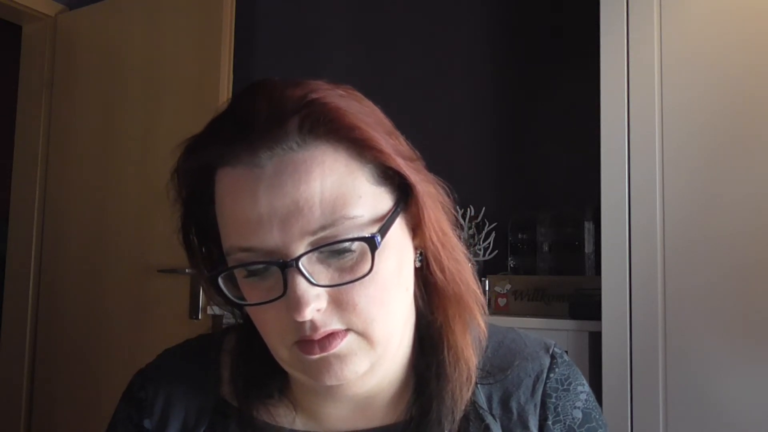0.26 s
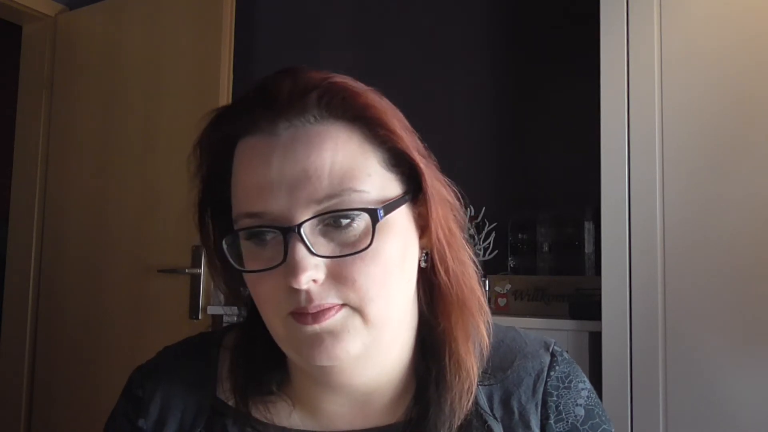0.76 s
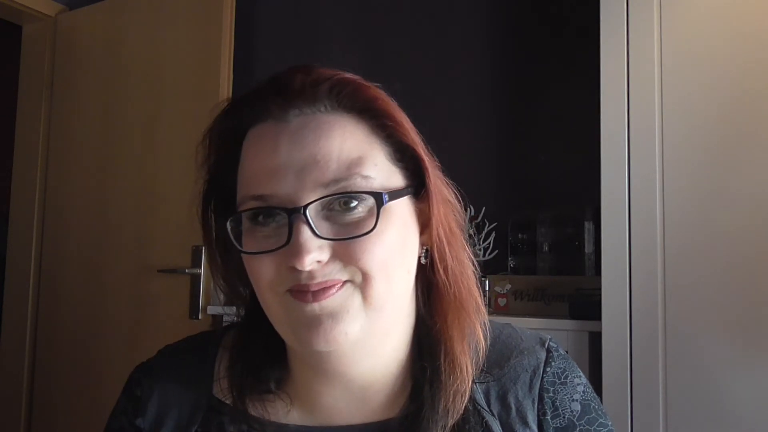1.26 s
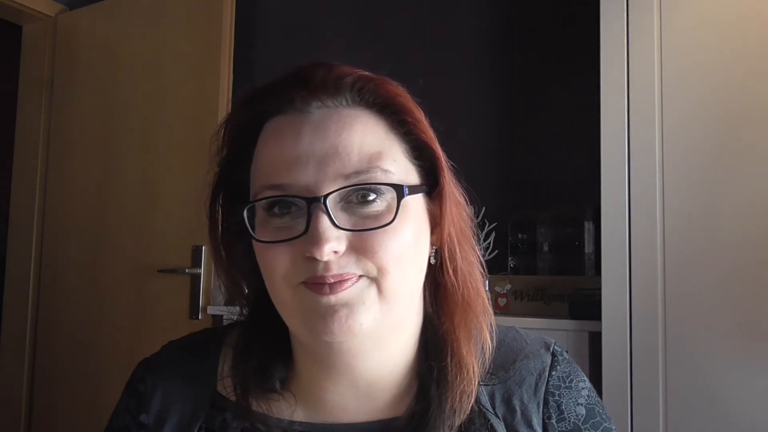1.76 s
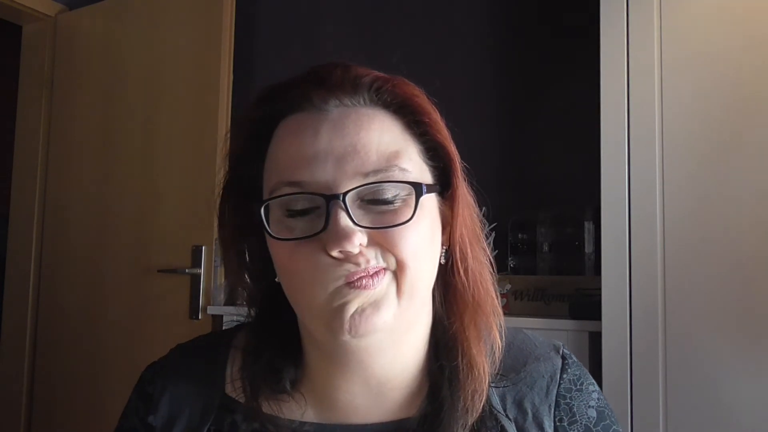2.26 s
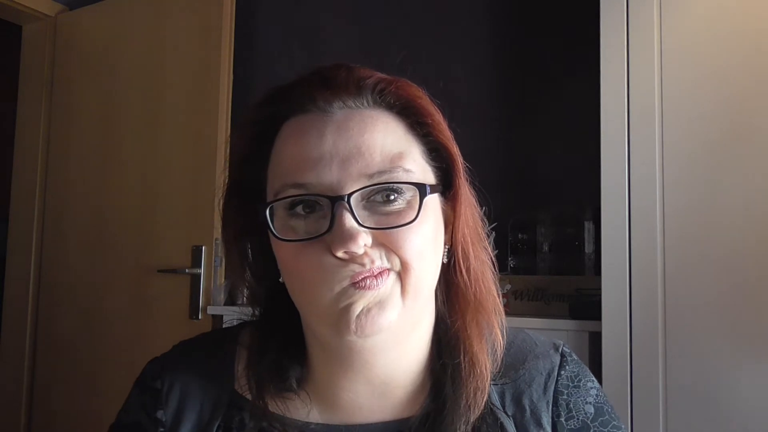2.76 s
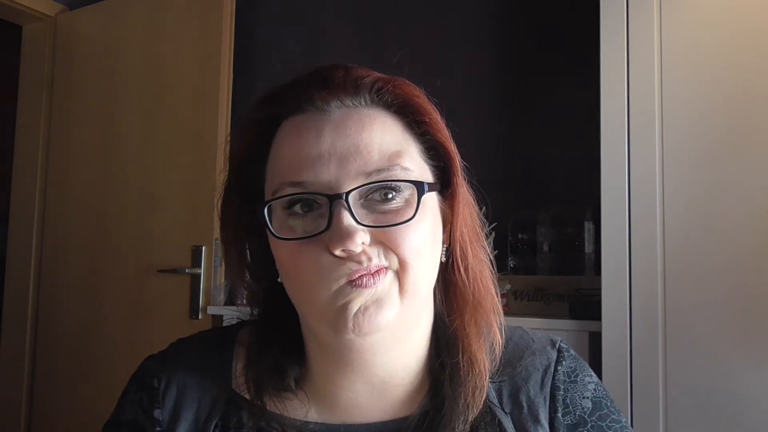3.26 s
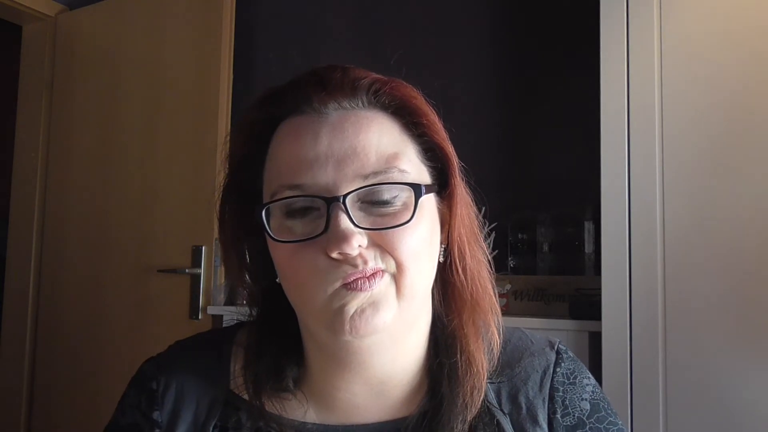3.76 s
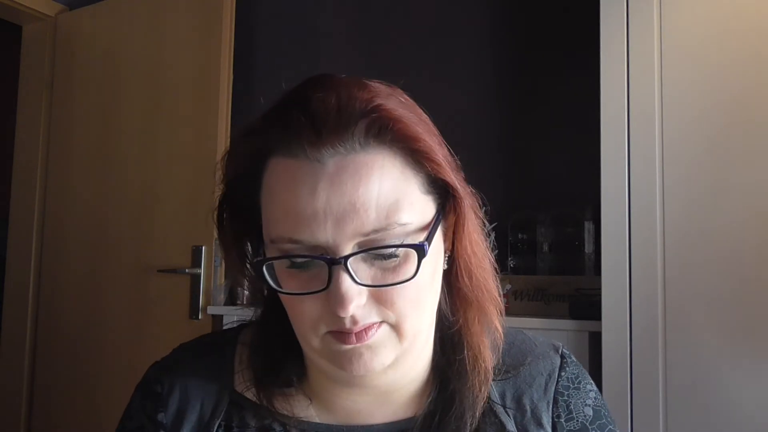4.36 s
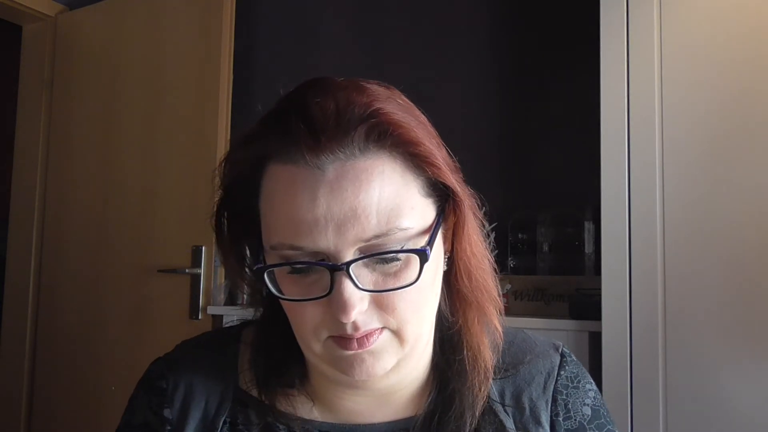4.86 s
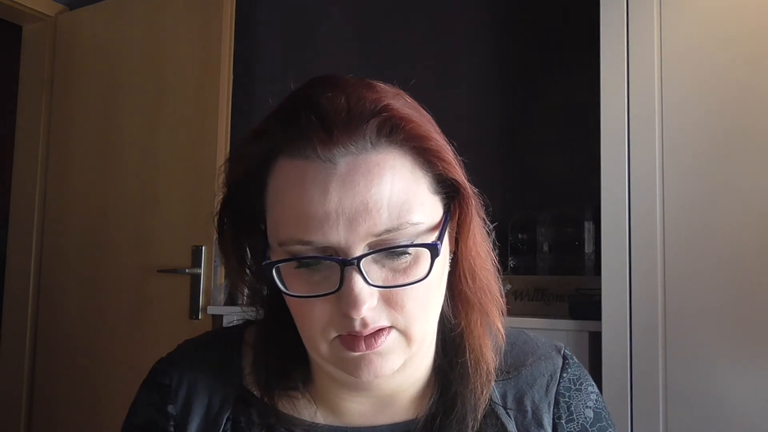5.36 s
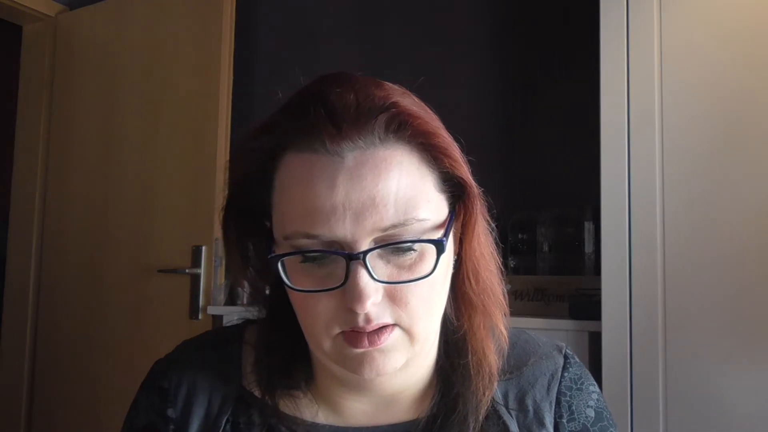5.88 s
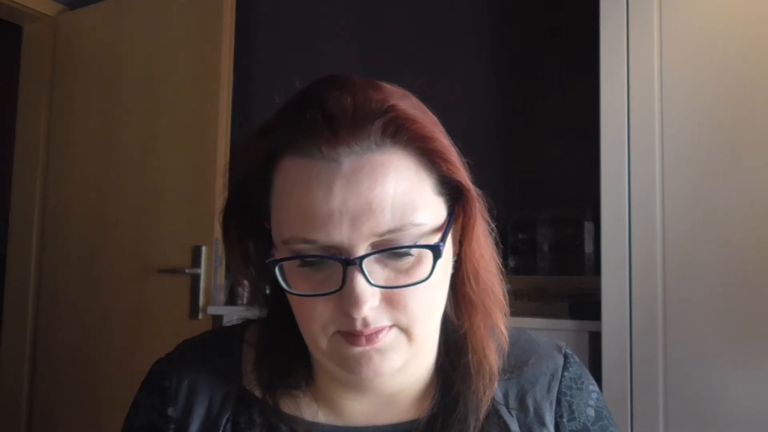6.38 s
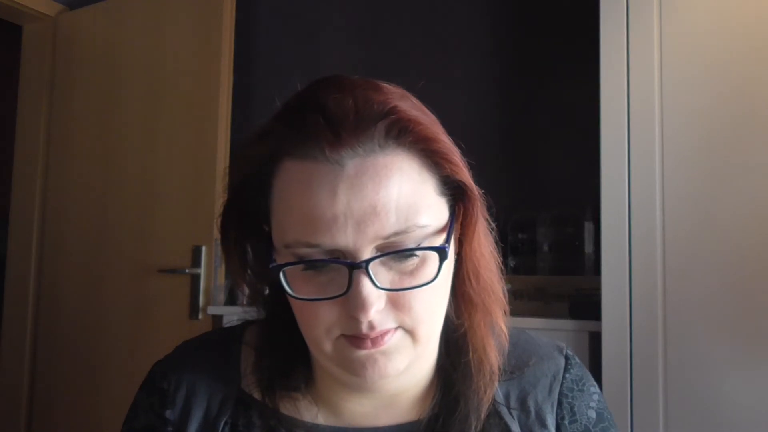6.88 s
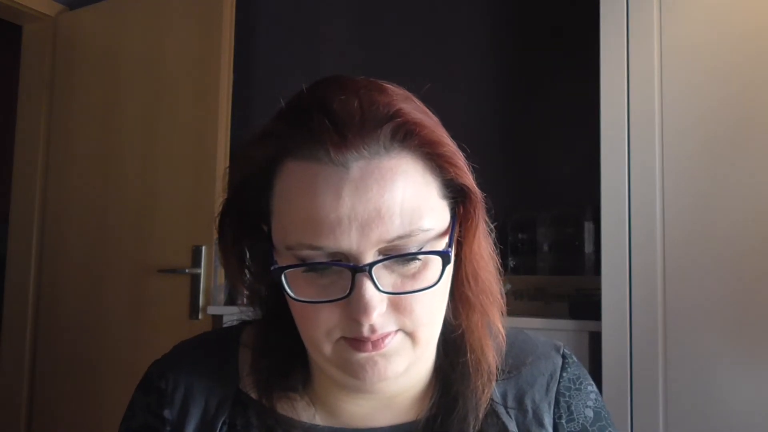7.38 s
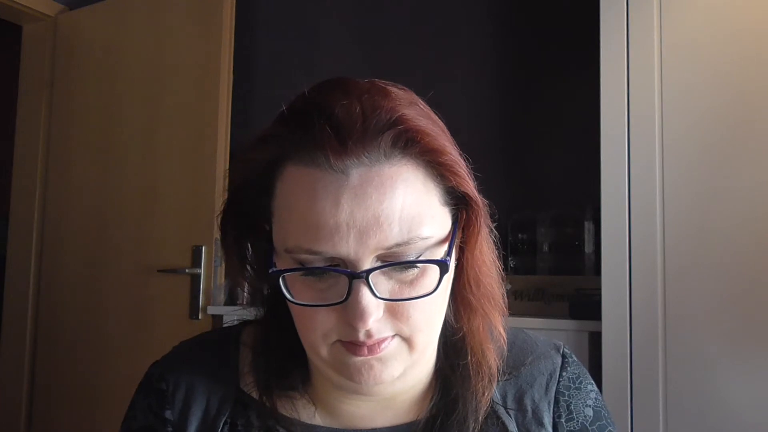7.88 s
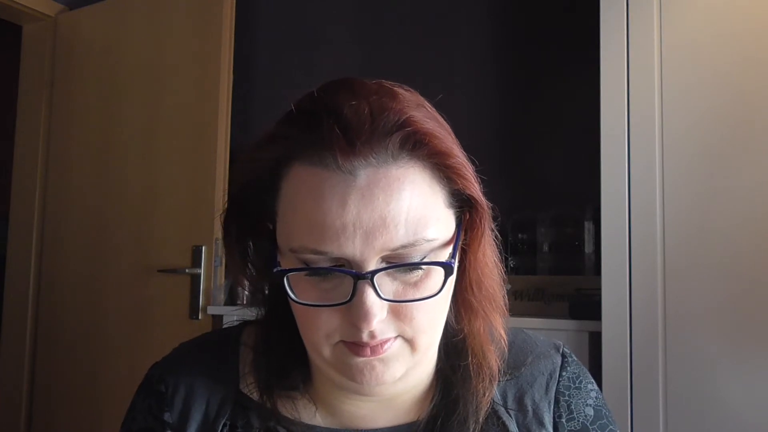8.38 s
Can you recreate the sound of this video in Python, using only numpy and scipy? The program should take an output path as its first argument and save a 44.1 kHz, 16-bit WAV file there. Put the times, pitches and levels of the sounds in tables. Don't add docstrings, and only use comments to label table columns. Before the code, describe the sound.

Close dry paper crackles and sparse clicks at a desk indoors build to crisp tugging and a double tear, then fade into light rustling.

```python
import sys
import numpy as np
from scipy import signal
from scipy.fft import rfft, irfft
from scipy.io import wavfile

SR = 44100
rng = np.random.default_rng(int(sys.argv[2]) if len(sys.argv) > 2 else 0)


def attenuation_scalar(level_db):
    decades = np.asarray(level_db, float) / 20
    return 10 ** decades


def master(y):
    cut = np.clip(np.atleast_2d(y).T, -1, 1)
    pcm = np.round(cut * 32767)
    wavfile.write(sys.argv[1], SR, pcm.astype(np.int16))


N = 380583


def rms_one(x):
    return x / np.sqrt(np.mean(x ** 2) + 1e-20)


def in_time(rows):
    s, *columns = np.transpose(rows)
    return [np.interp(np.arange(N) / SR, s, column) for column in columns]


def at_hz(points, hz):
    table_hz, value = np.array(points)[:, 0], np.array(points)[:, 1]
    return np.interp(np.log(hz + 1), np.log(table_hz), value)


def drift(rate_hz):
    r = np.exp(-2 * np.pi * rate_hz / SR)
    wander = signal.lfilter([1], [1, -2 * r, r * r], rng.standard_normal(N + SR))
    return rms_one(wander[SR:])


def colour(x, spectrum, fall_db_per_octave):
    hz = np.fft.rfftfreq(4096, 1 / SR) + 1
    low_hz, high_hz = spectrum[0][0], spectrum[-1][0]
    octaves_outside = np.log2(np.maximum(1, np.maximum(low_hz / hz, hz / high_hz)))
    gain_db = at_hz(spectrum, hz) - fall_db_per_octave * octaves_outside
    cepstrum = irfft(np.log(attenuation_scalar(gain_db)))
    cepstrum[1:2048] *= 2
    cepstrum[2049:] = 0
    response = irfft(np.exp(rfft(cepstrum)))
    response = response / np.sqrt(np.sum(response ** 2))
    return signal.oaconvolve(np.atleast_2d(x), response[None], axes=1)[:, :N]


# (time [s], level [dB])
TRAFFIC = [(0.0, -86), (0.36, -76.5), (1.71, -84), (2.86, -77.5), (4.3, -72), (5.45, -68), (5.79, -72),
           (7.3, -74), (7.62, -79), (8.63, -79)]


def rumble():
    both, own = rng.standard_normal((2, N))
    band = signal.butter(2, [45, 170], "band", fs=SR, output="sos")
    low = signal.sosfilt(band, both + 0.63 * own * [[1], [-1]])
    return attenuation_scalar(in_time(TRAFFIC)[0] - 0.5 + 2.8 * drift(4.0)) * rms_one(low)


# (frequency [Hz], density [dB/Hz])
HISS_SPECTRUM = [(15, -48), (40, -20.5), (150, -2.5), (214, 2), (706, -10.5), (927, -6.5), (1060, -13),
                 (1620, -12.5), (1800, -21.5), (2670, -23.5), (3810, -23), (6210, -24.5), (7510, -18),
                 (11000, -15.5), (15800, -26.5), (16600, -44)]


def hiss():
    noise = rng.standard_normal((2, N)) + 0.24 * rng.standard_normal(N)
    level_db = -63.28 + 2.3 * drift(3.6)
    return attenuation_scalar(level_db) * colour(noise, HISS_SPECTRUM, 30.0)


def fan():
    centre_hz, width_hz, level_db = 940, 21, -75
    r, w = np.exp(-np.pi * width_hz / SR), 2 * np.pi * centre_hz / SR
    air = rng.standard_normal((2, N))
    return attenuation_scalar(level_db) * rms_one(signal.lfilter([1, 0, -1], [1, -2 * r * np.cos(w), r * r], air))


# (time [s], pitch [Hz], level [dB])
HUM = [(0.0, 207.8, -78), (0.33, 214.6, -72), (0.74, 199.4, -89), (1.18, 215.9, -67), (1.3, 202, -78),
       (2.19, 217.3, -76), (2.52, 201.1, -78.5), (2.71, 216.2, -74), (3.27, 215.3, -64.5),
       (3.32, 216.8, -71.5), (3.99, 207.8, -63.5), (4.35, 221.6, -68), (4.45, 213, -53.5),
       (4.57, 211.1, -66.5), (5.48, 209.8, -68.5), (6.05, 214.0, -60), (8.05, 212.5, -75),
       (8.63, 215.5, -75)]


def hum():
    hz, level_db = in_time(HUM)
    phase = 2 * np.pi * np.cumsum(hz + 1.4 * drift(6.0)) / SR
    return attenuation_scalar(level_db - 1.0 + 2.5 * drift(6.0)) * np.sin(phase + np.array([[0], [.8]]))


# (time [s], pitch [Hz], level [dB])
ENGINE = [
    (6.85, 133, -88),
    (7.068, 127, -67),
    (7.75, 144.4, -70),
]


def engine():
    hz, level_db = in_time(ENGINE)
    t = np.arange(N) / SR
    heard = np.clip(np.minimum(t - ENGINE[0][0], ENGINE[-1][0] - t) * 10, 0, 1)
    return heard * attenuation_scalar(level_db) * np.sin(2 * np.pi * np.cumsum(hz) / SR)


# (frequency [Hz], t60 [s])
ROOM = [(150, 0.28), (500, 0.2), (1400, 0.2), (3700, 0.15), (9700, 0.11), (16000, 0.16)]


def room(x, onset_ms, apart):
    t = np.arange(SR // 2) / SR
    both, own = rng.standard_normal((2, len(t)))
    white, tail = both + apart * own * [[1], [-1]], 0
    for low_hz in 100 * 2. ** np.arange(8):
        band = signal.butter(2, [low_hz, min(2 * low_hz, .45 * SR)], "band", fs=SR, output="sos")
        tail = tail + signal.sosfilt(band, white) * attenuation_scalar(-60 * t / at_hz(ROOM, 1.4 * low_hz))
    tail = tail * (1 - np.exp(-(1000 * t / onset_ms) ** 2))
    return signal.oaconvolve(x, tail / np.sqrt(np.sum(tail ** 2) / 2), axes=1)[:, :N]


# (frequency [Hz], left minus right [dB])
LEAN = [(200, -0.5), (1000, -1.5), (4000, 1.5), (12000, -4)]


def lean(x):
    gain = attenuation_scalar(at_hz(LEAN, np.fft.rfftfreq(N, 1 / SR)) / 2)
    return irfft(rfft(x) * [gain, 1 / gain], N)


# (time [s], peak [dB], pitch [Hz], t60 [s], contact tick re peak [dB])
KNOCKS = [(0.304, -36.5, 520, 0.027, 0), (0.949, -30.5, 463, 0.028, -8), (0.963, -35, 467, 0.042, -14),
          (2.12, -29.5, 620, 0.026, -8), (3.145, -30, 473, 0.03, -8.5), (3.248, -34.5, 440, 0.061, -4),
          (3.535, -35, 509, 0.053, -18), (4.387, -33.5, 543, 0.052, -8.5), (4.388, -45, 1197, 0.06, -26),
          (4.428, -41.5, 1240, 0.061, -21), (4.427, -38, 212, 0.071, -10), (7.865, -47, 123.4, 0.033, -2),
          (8.205, -45.5, 1630, 0.048, 2), (8.213, -51, 1450, 0.24, -3)]
# (frequency [Hz], level [dB], t60 re the knock's [ratio])
PARCEL_MODES = [(494, -0.5, 0.66), (688, -8, 1.7), (915, -7, 1.2), (1910, -8, .6)]


def knocks():
    out = np.zeros(N)
    t = np.arange(SR // 5) / SR
    scatter = rng.standard_normal((len(KNOCKS), 8))
    grit = rng.standard_normal((len(KNOCKS), len(t)))
    for (s, level_db, hz, t60, tick_db), off, tick in zip(KNOCKS, scatter, grit):
        at = round((s + 0.003925) * SR)
        band = signal.butter(3, [hz / 2, hz + 865], "band", fs=SR, output="sos")
        tick = rms_one(signal.sosfilt(band, tick))
        ratios = np.append(1, 1.5 * np.exp(0.33 * off))
        levels = np.append(1, 0.085 / ratios[1:])
        modes = levels @ np.sin(2 * np.pi * hz * np.outer(ratios, t))
        if 440 < hz < 700 and s < 3.3:
            modes = 0.44 * modes
            for mode_hz, db, share in PARCEL_MODES:
                mode_db = db + 60 * t / t60 * (1 - 1 / share)
                modes = modes + attenuation_scalar(mode_db) * np.sin(2 * np.pi * mode_hz * t)
        out[at:at + len(t)] += attenuation_scalar(level_db - 60 * t / t60) * (.6 * modes + attenuation_scalar(tick_db) * tick)
    return signal.sosfilt(signal.butter(2, 110, "high", fs=SR, output="sos"), out)


# (middle [s], length [ms], crackle [dB], slack [dB])
RUBS = [(.51, 93, -44.5, -12), (.6, 230, -60, 3), (.68, 45, -60, 8), (1.41, 78, -54, 1), (1.7, 340, -85, 0),
        (2.55, 134, -46, -14), (2.62, 230, -51, -9.5), (2.72, 710, -60.5, -19), (3.0, 120, -62, -1),
        (3.142, 28, -48, -28), (3.37, 76, -46.5, -7), (3.418, 62, -48.5, -1.5), (3.6, 46, -56, -17.5),
        (5.03, 57, -43.5, -3.5), (5.13, 310, -44.5, -27), (5.329, 115, -44, -18), (5.45, 550, -58, 2.5),
        (5.54, 76, -54.5, 4.5), (5.631, 32, -44.5, -1.5), (5.74, 380, -58.5, 5), (5.8, 71, -50.5, -5.5),
        (6.99, 268, -52, -15), (7.228, 85, -44.5, -46), (7.4, 840, -56.5, -26), (7.7, 370, -71, -11),
        (7.871, 21, -42, -5), (8.24, 120, -49.5, -13), (8.348, 156, -45, -14.5), (8.52, 98, -48, -13)]
# (time [s], crackle [dB])
NUDGES = [
    (6.855, -59.5),
    (7.034, -64.5),
    (7.81, -63.5),
    (8.579, -64),
]
# (peak [s], swell per 20 dB [s], fade per 20 dB [s], crackle [dB], slack [dB])
TUGS = [(3.701, -0.07, -0.4, -43, -11), (3.804, 0.25, 0.7, -44, -52), (3.889, .012, 0.02, -29, -11),
        (3.928, 0.2562, 0.05, -39, -15), (4.05, 1, -3, -52, -14), (4.156, -0.28, -2.7, -43, -35),
        (4.223, -0.09, 0.27, -33.5, -14), (4.263, 0.15, -0.05, -31.5, -18), (4.396, -0.5, 1.5, -55, 8.5),
        (4.545, 0.26, 2.5, -48, -8), (4.732, -0.93, 0.38, -40, -8), (4.8, -0.18, 0.1532, -30, -7.5)]
# (time [s], crackle [dB], slack [dB])
TEAR_1 = [(5.894, -39, -12), (5.905, -51, -23), (5.966, -33.5, -15.5), (6.001, -29.5, -9),
          (6.057, -34.5, -11), (6.11, -29, 1.5), (6.17, -48, 3), (6.193, -34, -5.5), (6.318, -63, -6)]
TEAR_2 = [(6.317, -48, -17), (6.363, -34.5, -5), (6.408, -30.5, -2), (6.52, -36, -2.5), (6.629, -37.5, -12),
          (6.703, -33, -2.5), (6.784, -49.5, -5), (6.888, -50, -9)]


def strokes():
    rest_db, middle_db, middle_per_slack, rub_ends_db = -76.5, -3, 0.35, 17.5
    t, out = np.arange(N) / SR, attenuation_scalar(rest_db) * np.ones((3, N))
    shapes = []
    for s, ms, db, slack_db in RUBS + [(s, 30, db, 11.5) for s, db in NUDGES]:
        arch_db = db - rub_ends_db * ((t - s) * 2000 / ms) ** 2
        shapes.append((arch_db, middle_db, slack_db))
    for s, swell_s, fade_s, db, slack_db in TUGS:
        swell_s, fade_s = max(swell_s, .01), max(fade_s, .01)
        peak_db = db - 20 * np.maximum((s - t) / swell_s, (t - s) / fade_s)
        shapes.append((peak_db, middle_db, slack_db))
    for tear, tear_middle_db in ((TEAR_1, 5), (TEAR_2, -0.5)):
        pull_db, slack_db = in_time(tear)
        during = (t > tear[0][0]) & (t <= tear[-1][0])
        shapes.append((np.where(during, pull_db - 4, -200), tear_middle_db, slack_db))
    for level_db, shape_middle_db, slack_db in shapes:
        near = np.flatnonzero(level_db > -90)
        slack_db = (slack_db + 0 * t)[near]
        shares_db = np.array([0 * slack_db, shape_middle_db + middle_per_slack * slack_db, slack_db])
        out[:, near] = np.maximum(out[:, near], attenuation_scalar(level_db[near] + shares_db))
    return out


# (time [s], peak [dB], middle re crack [dB], boom re crack [dB])
CREASES = [(0.3087, -18.5, -6, -7), (0.5712, -31.5, -9, -16.5), (0.5897, -35.5, 4, -16),
           (0.952, -19.5, -15, -6), (0.9683, -20.5, -12, -14), (1.1699, -37.5, -10.5, -4),
           (1.3362, -30.5, -2.5, -8.5), (1.5192, -33, -13.5, -45), (1.9877, -32, -26, -38),
           (2.1252, -8.5, -13.5, -10.5), (2.3815, -29, -11, -15.5), (2.446, -34, -9, -16),
           (2.6057, -35.5, -31, -12), (2.936, -43.5, -19, -12), (2.9968, -41, -36, -10),
           (3.149, -12.5, -7, -57), (3.2507, -23, 0.5, -1.5), (3.257, -22, -34, -22),
           (3.539, -41, -5.5, -24), (3.6271, -45, -22, -43), (5.02, -31, -11.5, -23),
           (5.3964, -29, -15, -23), (5.4358, -28, -9.5, -11), (5.5907, -40, 0, -7), (5.714, -29.5, -4, -9),
           (5.723, -30, -9, -11), (5.8132, -42, -43, -26), (5.8718, -39.5, -26, -11),
           (6.971, -31.5, -28, -31), (7.2958, -32.5, -7, -14)]
# (time [s], peak [dB], middle re crack [dB], boom re crack [dB])
TUGGED = [(3.7953, -19, -11, -24), (3.8011, -19.5, -29, -25), (3.835, -29.5, -34, -40),
          (3.8781, -27, -38, -47), (3.889, -27.5, 2, -10), (3.9048, -26, 4, -24), (3.942, -23.5, -6.5, -32),
          (4.0314, -38, -13, -9), (4.07, -30, -20, -31), (4.1068, -37, -33, -39), (4.1435, -20, -18, -49),
          (4.1568, -17.5, -21, -50), (4.2, -28.5, -23, -49), (4.225, -15, -9, -29), (4.2547, -13, -22, -29),
          (4.263, -13.5, -31, -38), (4.2876, -34.5, 7.5, -23), (4.3033, -14, -15, -36),
          (4.345, -37, -12, -37), (4.3753, -28, -5, -29), (4.423, -27, -12, -28), (4.4978, -29, -27, -27),
          (4.5352, -27.5, -31, -41), (4.5632, -33, -27, -29), (4.6348, -33, -35, -11.5),
          (4.7014, -32.5, -28.5, -19), (4.736, -25, -12, -35), (4.7756, -17, -10, -24.5),
          (4.8016, -8.5, -7, -48), (4.8358, -21.5, -33, -21)]
# (time [s], peak [dB])
TICKS = [(.68, -57), (.73, -52), (1.2034, -44.5), (1.3242, -38), (1.3945, -47), (1.4133, -44), (1.432, -47),
         (1.973, -48), (2.7, -45), (2.728, -43), (3.0098, -45), (3.124, -46), (3.161, -47), (3.206, -41),
         (3.2411, -45), (3.77, -49), (3.76, -49), (3.811, -37), (3.8148, -32), (3.841, -40), (3.85, -45),
         (3.858, -47), (3.866, -46), (3.948, -34), (4.1636, -57), (4.338, -33.5), (4.3798, -37),
         (4.4305, -29), (4.5702, -31), (4.659, -37), (4.678, -41), (5.42, -46), (5.495, -44), (5.511, -48),
         (5.535, -43), (5.54, -51), (8.152, -62)]
# (time [s], peak [dB])
RUSTLE = [(3.882, -25), (3.8933, -22.5), (3.9, -19), (3.9123, -22), (3.919, -21), (3.9312, -34),
          (4.1495, -32), (4.1634, -34), (4.2157, -22), (4.2216, -10), (4.2271, -25), (4.2841, -23),
          (4.3142, -32), (4.344, -33), (4.3807, -31), (4.433, -32), (4.4662, -36), (4.4768, -36),
          (4.503, -36), (4.5467, -38), (4.5539, -26), (4.602, -46), (4.612, -38), (4.7295, -38),
          (4.7416, -30.5), (4.7594, -24.5), (4.7878, -12), (5.017, -38), (5.026, -36), (5.0815, -37),
          (5.152, -48), (5.3278, -45), (5.3344, -49), (5.3498, -38), (5.383, -53), (5.4062, -42),
          (5.43, -33), (5.5407, -39), (5.6266, -47), (5.6334, -39), (5.7205, -36), (5.7958, -44),
          (5.8149, -35)]
# (time [s], peak [dB], brightness [dB])
JUMPS_1 = [(5.911, -15.5, -4.5), (5.9285, -28, 4), (5.935, -10.5, 1), (5.9448, -22, -2), (5.955, -23, 3),
           (5.9587, -24, 4), (5.9655, -18, 3), (5.968, -9, 6), (5.9722, -20, 6), (5.9745, -13.5, 6),
           (5.9782, -25, 3), (5.9879, -14, -4), (5.9945, -25, 4), (5.9967, -15, -1.5), (6.0026, -10, 0.5),
           (6.008, -17, 1), (6.012, -19, 3), (6.0167, -21, -3), (6.0212, -25, 1), (6.0245, -22, -2),
           (6.0344, -19, 3), (6.0382, -25, -1), (6.0426, -19, 2), (6.0482, -31, -1), (6.055, -29, 0),
           (6.0586, -20, 4), (6.0662, -32, 2.5), (6.072, -24, 2), (6.076, -19, 3), (6.0812, -25, 5),
           (6.0853, -19, 7), (6.0892, -22, 0.5), (6.0937, -16, 5), (6.097, -26, 1.5), (6.1017, -16, 6),
           (6.1072, -15, -5), (6.1107, -17, 0), (6.118, -31, -1), (6.1208, -20, -3), (6.1243, -37, 0),
           (6.1275, -26, 4), (6.1382, -25, 10), (6.1417, -33, 0.5), (6.1498, -15.5, 4), (6.1531, -30, 6),
           (6.1791, -25, 4), (6.1831, -9.5, 4), (6.1873, -15, -1), (6.193, -14.5, 4), (6.1954, -29, -1.5),
           (6.1995, -13, 0), (6.2053, -29, 4), (6.2113, -33, 1), (6.2215, -34, -3), (6.2414, -21, 2),
           (6.247, -18.5, 3)]
JUMPS_2 = [(6.3479, -27, 1), (6.3569, -24, 2), (6.3653, -25, -1), (6.3701, -16, -2), (6.3762, -22, 2),
           (6.3797, -28, 2), (6.3892, -32, 6), (6.3995, -19, 2), (6.4027, -24, 4), (6.4171, -13, 1),
           (6.423, -17, 0), (6.4293, -27, -1), (6.4324, -17, 2), (6.4396, -25, 3), (6.4475, -15, 1),
           (6.456, -24, -3), (6.463, -20, -2), (6.4675, -25, 2), (6.477, -21, 9), (6.4807, -20, 2),
           (6.4844, -19, 4), (6.4874, -10, 6), (6.491, -31, -1.5), (6.4955, -32, 0), (6.5051, -32, -1),
           (6.5107, -18, -1.5), (6.5132, -23, 0), (6.5163, -7, 3), (6.5209, -12, -1), (6.5266, -21, 4),
           (6.5293, -23, 2), (6.5337, -22, -1), (6.54, -18, 3), (6.548, -24, 3), (6.5526, -17, 2),
           (6.5654, -22, 8), (6.5725, -25, 3), (6.5801, -25, 2.5), (6.5832, -30, 0), (6.5889, -34, 0.5),
           (6.5994, -16, 1), (6.606, -25, 5), (6.614, -21, 0.5), (6.623, -24, 2), (6.6316, -30, 1.5),
           (6.6414, -13, 3), (6.6484, -22, 9), (6.655, -12, -4), (6.6612, -16, 2), (6.6708, -9.5, 0.5),
           (6.6762, -27, 5), (6.6829, -32, 3), (6.6897, -18, 3), (6.6934, -23, 7), (6.6995, -14, 9),
           (6.7064, -8.5, -1), (6.7103, -21, -1), (6.719, -11.5, -1), (6.7337, -13, 1), (6.751, -30, -4)]


def creases(column, taut_db=0, tilt=0, splinter=False):
    thinning = 0.48
    ticks = TICKS + [(s, db - 1.5) for s, db in RUSTLE]
    loose = [(*row, 0) for row in CREASES] + [(s, db, -15, -22.5, 0) for s, db in ticks]
    taut = [(*row, 0) for row in TUGGED]
    for jumps, tear, middle_db, boom_db in ((JUMPS_1, TEAR_1, -18.5, -13.5), (JUMPS_2, TEAR_2, -28.5, -10.5)):
        tear_s, _, slack_db = np.transpose(tear)
        usual_db = np.median(jumps, axis=0)[2]
        for s, db, bright_db in jumps:
            jump_middle_db = middle_db - thinning * (db + 22) / 2
            jump_boom_db = boom_db + np.interp(s, tear_s, slack_db) - thinning * (db + 20.5)
            jump_tilt_db = np.clip(0.84 * (bright_db - usual_db), -9, 9)
            taut.append((s, db - 1.06, jump_middle_db, jump_boom_db, jump_tilt_db))
    rows, clicks = np.array(loose + taut), np.zeros(N)
    level_db = rows[:, 1] + taut_db * (np.arange(len(rows)) >= len(loose))
    level_db = level_db + (rows[:, column] if column else 0) + tilt * rows[:, 4]
    np.add.at(clicks, (rows[:, 0] * SR).astype(int), attenuation_scalar(level_db))
    if splinter:
        spread_ms, step_db, step_spread_db = 2.2, -14, 9.5
        off, size = rng.standard_normal((len(rows), 2, 3)).transpose(1, 2, 0)
        at = ((rows[:, 0] + off * spread_ms / 1000) * SR).astype(int)
        np.add.at(clicks, at, attenuation_scalar(level_db + np.minimum(step_db + step_spread_db * size, -3)))
    return clicks


# (time [s], length [ms], level [dB])
RIPS = [
    (4.225, 4.5, -37),
    (4.793, 12, -10),
    (6.481, 4.4, -20),
    (6.7, 4, -22),
    (7.866, 5, -57),
]


def rips(slip_ms):
    clicks = np.zeros(N)
    for (s, length_ms, level_db), uneven in zip(RIPS, rng.standard_normal((len(RIPS), 2, 16))):
        after_ms = np.cumsum(slip_ms * np.exp(0.067 * uneven[0]))
        at = ((s + after_ms / 1000) * SR).astype(int)
        clicks[at] = attenuation_scalar(level_db + 2 * uneven[1]) * (after_ms < length_ms)
    return clicks


def snaps(column, tilt=0):
    return creases(column, tilt=tilt, splinter=True) + rips(slip_ms=1.6) * attenuation_scalar(-7.0 * column)


def hands():
    settle_db, settle_dull_db, settle_db_per_s, settle_rise_ms = -29, 8.5, 206, 1.5
    strain_db, strain_ms = -38.5, 1.8
    fall, rise = attenuation_scalar(-settle_db_per_s / SR), np.exp(-1000 / (settle_rise_ms * SR))
    clicks = [creases(column, taut_db=-10) * attenuation_scalar(settle_dull_db * (column > 0)) for column in (0, 2, 3)]
    clicks = np.array(clicks) + 1e-18
    settle = attenuation_scalar(settle_db) * signal.lfilter([1 - rise], np.convolve([1, -fall], [1, -rise]), clicks)
    creak = np.exp(-1000 / (strain_ms * SR))
    strain = attenuation_scalar(strain_db) * signal.lfilter([1], [1, -creak], clicks[:, ::-1])[:, ::-1]
    crackle_db, middle_db, boom_db = 10 * np.log10(strokes() ** 2 + settle ** 2 + strain ** 2)
    return crackle_db, middle_db - crackle_db, boom_db - crackle_db


def fibres(crackle_db, per_s, spread_db, clump_db):
    sizes = attenuation_scalar(spread_db * np.minimum(rng.exponential(1, N), 3))
    chance = per_s * attenuation_scalar(clump_db * drift(200)) / SR
    breaks = rms_one(sizes * (rng.random(N) < chance))
    torn = 1 / (1 + attenuation_scalar(-36.5 - crackle_db) ** 2)
    return attenuation_scalar(crackle_db) * (torn * breaks + (1 - torn) * 0.072)


def bursts(clicks, decay_ms):
    length = decay_ms * SR / 1000
    r = np.exp(-2 / length)
    both, own = rng.standard_normal((2, N))
    envelope = signal.lfilter([4 / length], [1, -2 * r, r * r], clicks)
    return envelope * (both + 0.27 * own * [[1], [-1]])


# (frequency [Hz], density [dB/Hz])
CRACK = [(2940, -37), (5000, -12), (6420, -6.5), (7610, 0), (9340, -1.5), (11500, 2.5), (15100, -12),
         (16000, -26.5), (16700, -46)]
MIDDLE = [(1290, -16.5), (2200, -4), (2610, -9), (3190, -0.5), (3620, 0.5), (3930, 1.5), (6500, -6.5),
          (8450, -3.5), (14300, -120)]
BOOM = [(180, -41.5), (300, -10.5), (442, 2.5), (596, -2.5), (689, 1), (971, -3), (1700, -7), (2600, -20),
        (3380, -46.5), (5720, -120)]


def paper():
    crackle_db, middle_db, boom_db = hands()
    breaks = fibres(crackle_db, per_s=2400.0, spread_db=-3.0, clump_db=5.5)
    buckles = fibres(crackle_db, per_s=170.0, spread_db=3.5, clump_db=4.5)
    crack = 0
    for kind, tilt in (("low", -1), ("high", 1)):
        split = signal.butter(2, 9500, kind, fs=SR, output="sos")
        clicks = snaps(column=0, tilt=tilt) * attenuation_scalar(-4.0) + breaks * attenuation_scalar(-15.5 + 2.7 * drift(28.0))
        crack = crack + signal.sosfilt(split, bursts(clicks, decay_ms=0.44))
    middle = snaps(column=2) * attenuation_scalar(7.5)
    middle = middle + bursts((breaks + buckles) * attenuation_scalar(middle_db - 25.0), decay_ms=0.61)
    boom = snaps(column=3) * attenuation_scalar(9.5)
    boom = boom + bursts(buckles * attenuation_scalar(boom_db - 22.0), decay_ms=1.06)
    return colour(crack, CRACK, 31.0) + colour(middle, MIDDLE, 28.0) + colour(boom, BOOM, 27.0)


def scene():
    background = hiss() + fan() + hum() + rumble() + engine()
    direct = paper() + knocks()
    walls = attenuation_scalar(-3) * room(direct.mean(axis=0, keepdims=True), onset_ms=2.5, apart=.75)
    return lean(direct + walls) + background


def top_cut(x):
    return signal.sosfilt(signal.butter(12, 16600, fs=SR, output="sos"), x)


def record(dry):
    top = .7
    mix = top * np.tanh(dry / top)
    return top_cut(mix)


dry = scene()
out = record(dry)
master(out)
```